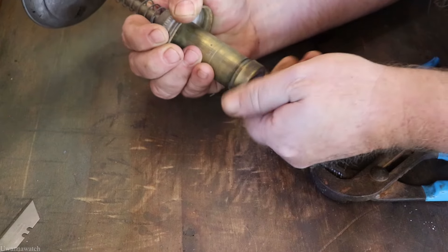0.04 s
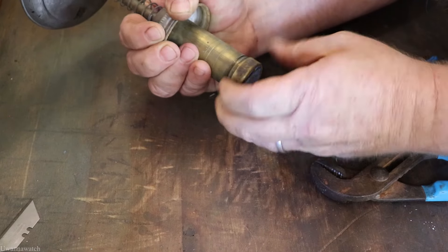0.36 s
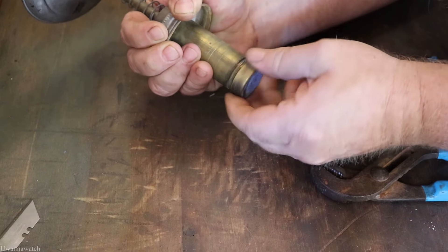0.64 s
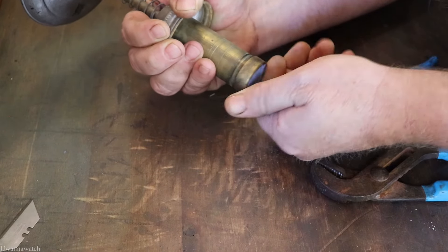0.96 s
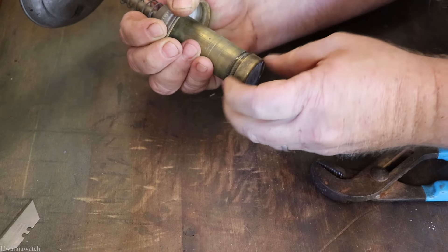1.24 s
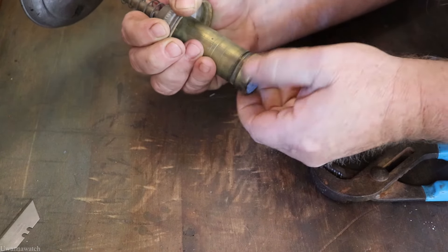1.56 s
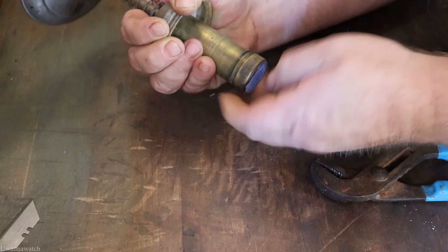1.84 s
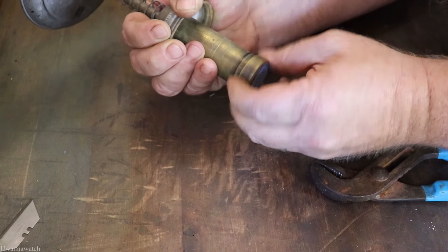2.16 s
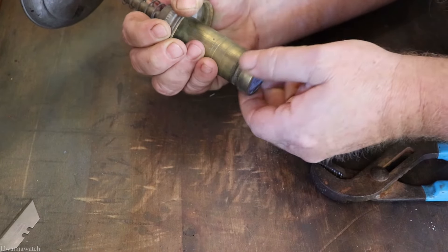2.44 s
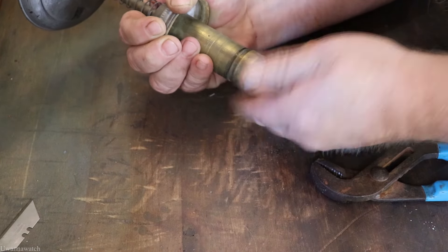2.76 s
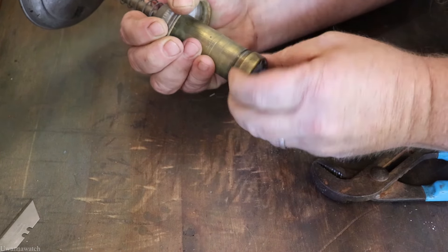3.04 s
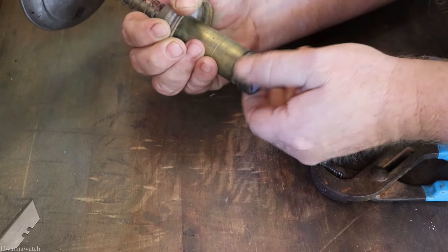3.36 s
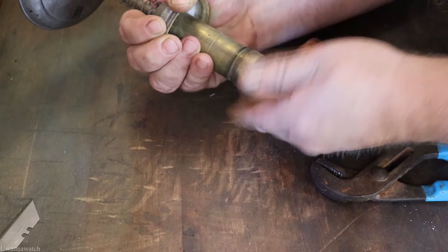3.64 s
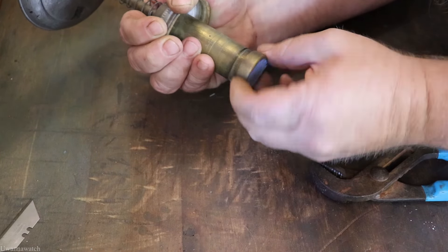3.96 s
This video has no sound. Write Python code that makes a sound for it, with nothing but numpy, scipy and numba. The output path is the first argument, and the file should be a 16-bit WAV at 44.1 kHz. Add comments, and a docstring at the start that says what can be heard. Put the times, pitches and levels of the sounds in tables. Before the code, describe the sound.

Dry threads squeak and scrape close to the microphone as a hand unscrews a brass fitting in five short turns. Light metal clicks fall between the turns, over a steady fan and electrical hum in a small workshop.

```python
"""Dry threads scrape and squeak close to the microphone: a hand unscrews a brass fitting in five
short turns over a workbench. The threads stick and slip in brief tones that turn raspy under
pressure, and the loose parts click at each new grip. Behind them, two groups of dull bumps, a fan
and mains hum fill a small workshop. The recorder's limiter ducks after the loudest squeaks."""
import sys
import numpy as np
from scipy import signal
from scipy.fft import rfft, irfft
from scipy.io import wavfile
from numba import njit

SR = 44100
rng = np.random.default_rng(int(sys.argv[2]) if len(sys.argv) > 2 else 0)


def master_out(mix):
    """Clip the mix to full scale and print it as 16-bit PCM to the path in sys.argv[1]."""
    frames = np.transpose(np.atleast_2d(mix))
    ceiling = np.clip(frames, -1, 1)
    pcm = np.round(ceiling * 32767).astype(np.int16)
    wavfile.write(sys.argv[1], SR, pcm)


N = 176400
T = np.arange(N) / SR

# Squeaks of the threads. Each row: start in seconds, length in seconds, first and last pitch in Hz,
# tone level in dB, then rasp and overtones in dB against the tone, before the brass colours them.
THREAD_SQUEAKS = [ (0.078, 0.018, 5040, 5000, -33, -14, -5), (0.1416, 0.014, 1660, 1346, -16, -0.5, -1),
                  (0.145, 0.028, 2826, 2705, -25.5, 8, -15), (0.176, 0.024, 3032, 2633, -22, 9.5, 5.5),
                  (.687, 0.013, 1696, 1693, -11.5, -3.5, -8), (0.6874, 0.0072, 4950, 4770, -5, -24, -31),
                  (0.696, 0.015, 4855, 4840, -2.5, -26, -13), (0.705, 0.011, 4850, 5040, -14, -2, 3),
                  (.712, 0.045, 4920, 4930, -25, -3, -15), (0.759, 0.023, 3060, 2766, -18, -13, -11),
                  (.762, 0.047, 4900, 4850, -29, -9, -24), (0.775, 0.011, 1730, 1630, -27, -5, -16),
                  (.817, 0.0063, 1570, 1790, -18, -5.5, -21), (.82, .036, 1950, 2220, -27, -10, -6.5),
                  (0.914, 0.033, 2380, 1645, -12.5, -8.5, 2.5), (0.929, 0.029, 1720, 1442, -8.5, -6.5, 2),
                  (0.95, 0.027, 1574, 1742, -15.5, -4, 3.5), (1.007, 0.027, 2970, 2596, -29, -2.5, -14),
                  (1.493, 0.013, 2900, 2770, -27.5, -1.5, -14), (1.515, .009, 1620, 1570, -20, -16, -18),
                  (1.533, 0.025, 1330, 1486, -19.5, -3, -1.5), (1.535, 0.023, 4700, 5020, -14.5, -6, -24),
                  (1.566, 0.017, 2086, 2056, -12.5, -20, -10), (1.571, .014, 5130, 5160, -18, -17, -14),
                  (1.612, 0.013, 1985, 1930, -27.5, -6.5, -14), (2.26, 0.015, 1800, 1690, -27.5, -7, -14),
                  (2.291, 0.015, 1780, 1970, -27, -9, -11), (2.302, 0.022, 4910, 4980, -29, -19, -23),
                  (2.387, 0.02, 4930, 4780, -5, -23, -14.5), (2.403, 0.025, 2200, 2554, -18.5, -1.5, -7),
                  (2.416, 0.015, 1150, 1217, -22.5, -5, -4), (2.442, 0.048, 4950, 4900, -29, -5, -21),
                  (2.495, 0.022, 2030, 1975, -19.5, -15.5, -18),
                  (2.551, 0.028, 2061, 1885, -19.5, -.5, -0.5), (2.557, 0.028, 2866, 2708, -13, -22, -4),
                  (2.581, .038, 2765, 2715, -23, -3.5, -15), (2.614, 0.024, 2380, 2040, -17, -14, -20),
                  (2.647, .022, 2020, 1430, -7.5, -7.5, 2), (2.663, 0.015, 1669, 1740, -8.5, -2, -22),
                  (2.729, .018, 1667, 1370, -20.5, -1.5, -20), (3.224, .013, 1470, 1370, -20.5, -9, -9),
                  (3.236, 0.025, 2857, 2680, -7.5, -19, -11), (3.242, 0.022, 4750, 4790, -20, -13, -25),
                  (3.329, 0.0073, 1670, 1540, -21, -9.5, -25), (3.347, 0.029, 1640, 1510, -22, -20, -22),
                  (3.465, .028, 4980, 5060, -33.5, -10, -12), (3.512, .0074, 2940, 3060, -20.5, -6.5, -7),
                  (3.545, 0.036, 2008, 1957, -13.5, -11, -6)]
# How well the fitting radiates a squeak's overtones. Each row: frequency in Hz, gain in dB.
OVERTONE_RADIATION = [(2700, -4), (3800, 1), (5900, -1), (7300, -8), (9400, 5.5), (10800, -14.5),
                      (16000, -12)]
# Resonances of the fitting under friction. Each row: centre in Hz, width in Hz, relative gain in dB.
BRASS_RESONANCES = [(1740, 770, 3.5), (2720, 630, 12), (3680, 370, 10), (4817, 130, 18.5), (5160, 99, 1.5),
                    (5760, 200, -1.5), (6720, 50, 5.5), (8670, 71, 6.5), (9140, 79, 0), (10400, 200, -2),
                    (12460, 320, 5.5), (14200, 300, 5), (15500, 160, -5)]
# Treble edge above which the brass hardly rings. Each row: frequency in Hz, gain in dB.
BRASS_ROLLOFF = [(9900, 0.5), (11000, -12)]
# Sliding of the threads, one list for each turn. Each row: time in seconds, level in dB.
TURN_LEVELS = [
    [(0, -32), (.13, -36.5), (.21, -36), (.27, -30.5), (.31, -47)],
    [(.61, -45), (.65, -33.5), (.72, -31), (.84, -28.5), (.89, -34), (1.0, -24), (1.07, -37.5), (1.13, -46)],
    [(1.44, -43), (1.51, -29), (1.63, -31), (1.68, -37.5), (1.73, -54)],
    [(2.22, -54), (2.28, -35), (2.35, -38.5), (2.44, -28.5), (2.53, -49), (2.62, -27), (2.77, -32.5),
     (2.81, -59)],
    [(3.13, -46), (3.19, -39), (3.23, -25.5), (3.30, -35.5), (3.62, -31.5), (3.68, -45)],
]
# Tone of the scrape, on top of the brass resonances. Each row: frequency in Hz, relative gain in dB.
SCRAPE_TONE = [(400, -16), (1500, 17.5), (4300, 9), (4900, 8), (7000, 8.5), (11500, 14), (14000, 9)]
# Clicks from play in the threads. Each row: start in seconds, strength in dB.
GRIP_CLICKS = [(0.558, -15.5), (1.389, -14.5), (1.5403, -6.5), (1.546, -6.5), (1.74, -7), (2.175, -7),
               (2.767, -10), (3.103, -4), (3.612, -14)]
# Ring of the tapped fitting. Each row: frequency in Hz, relative level in dB, seconds to fall 60 dB.
TAP_MODES = [(507.5, -11, 0.17), (563, -18, 0.11), (1560, 4, 0.014), (4700, -4.5, 0.023),
             (6370, -7.5, 0.015), (8950, -26, 0.027)]
# Dull bumps. Each row: start in seconds, knock strength in dB, boom level in dB.
DULL_BUMPS = [(0.07, -27, -40), (0.2, -26, -42), (0.242, -16, -37), (1.759, -20, -31.5), (1.822, -29, -47)]
# Spectrum of a bump's knock. Each row: frequency in Hz, relative level in dB.
KNOCK_SPECTRUM = [(100, -38), (300, -1.5), (450, -16), (620, -10), (1250, -11), (1800, -25), (5000, -78)]
# The fan's rush, used from 200 Hz up. Each row: frequency in Hz, relative density in dB.
FAN_RUSH = [(120, -36), (200, -4.5), (380, -7), (647, -0.5), (1400, 0), (3430, -2), (4680, -13.5),
            (6280, -15), (9060, -31.5), (16000, -41.5)]
# The fan's low rumble. Each row: frequency in Hz, relative density in dB.
FAN_RUMBLE = [(20, -25), (50, -13.5), (80, -11), (150, -6.5)]
# Mains hum and a faint motor whine. Each row: frequency in Hz, rms level in dB.
HUM_TONES = [(120, -35.5), (620, -51)]

PEAK_AT, SWELL_POWER, FADE_POWER = .4, .91, .26  # a faint squeak: peak place (0-1), rise and fall curves
LOUD_DELAY, LOUD_SWELL, LOUD_FADE = .56, 1.33, .2  # added at full level: it builds up, then breaks off
JITTER, JITTER_HZ, SHIMMER = .024, 600, .7  # pitch scatter at full rasp, its speed, level scatter
SLIP_SCATTER_RAD, SLIP_SCATTER_HZ = .19, 1100  # uneven timing of the slips, its speed
OVERTONE_DB_PER_OCTAVE, BLOOM = -3.5, .18  # bloom brings each higher overtone in later
SCREECH_HZ, SCREECH_DB = 8500, -17  # lower edge of the screech, its gain at full level
FINE_MODES_T60_S, FINE_MODES_DB = .09, -5
CATCHES_PER_S, CATCH_SPREAD_DB, SLIDE_DB = 650, 4, -8  # smooth sliding is set against the catches
CRACK_DB, RING_DB = -4.5, -12.5
HARD_CRACK_S, HARD_CRACK_HZ = .001, 21800  # rise and treble edge at full strength, before the TOP_HZ cap
KNOCK_S, BOOM_S, BOOM_HZ, BOOM_WIDTH_HZ = .021, .019, 77, 26
FAN_DB = -31
ROOM_DB, ROOM_T60_S, ROOM_GAP_S = -9, .2, .0067
LIMIT_DB, LIMIT_ATTACK_S, LIMIT_HOLD_S, LIMIT_RELEASE_DB_PER_S = -7.5, .00046, .028, 159
TOP_HZ = 15800


def squeaks():
    """Stick-slip tones up close: under pressure the cycle grows uneven, gains overtones and rasps."""
    tones, overtones, rasp, load = np.zeros((4, N))
    jitter, shimmer = wander(JITTER_HZ), wander(hz=175)
    grit = noise() * undb(1.6 * wander(hz=1200))
    scatter = wander(SLIP_SCATTER_HZ)
    for start, length, first_hz, last_hz, db, rasp_db, overtone_db in THREAD_SQUEAKS:
        progress = np.linspace(0, 1, int(length * SR))
        span = np.arange(len(progress)) + int(start * SR)
        level = undb(db)
        peak = min(PEAK_AT + LOUD_DELAY * level, .95)
        swell = (progress / peak) ** (SWELL_POWER + LOUD_SWELL * level)
        fade = ((1 - progress) / (1 - peak)) ** (FADE_POWER + LOUD_FADE * level)
        pressure = np.minimum(swell, fade)
        bite = np.sqrt(pressure)
        roughness = min(undb(rasp_db / 2), 1) * bite
        glide_hz = first_hz + (last_hz - first_hz) * progress
        hz = glide_hz * (1 + JITTER * roughness * jitter[span])
        phase = 2 * np.pi * np.cumsum(hz) / SR
        offsets = 2 * np.pi * rng.random(size=16)
        slip_phase = phase + SLIP_SCATTER_RAD * scatter[span]
        harmonics = 0
        for k in range(2, int(TOP_HZ / first_hz) + 1):
            weight = undb(OVERTONE_DB_PER_OCTAVE * np.log2(k)) * pressure ** (BLOOM * (k - 2))
            harmonics += weight * np.sin(k * slip_phase + offsets[k])
        envelope = level * pressure * np.exp(SHIMMER * roughness * shimmer[span])
        add(tones, start, np.sqrt(2) * envelope * np.sin(phase))
        add(overtones, start, np.sqrt(2) * envelope * bite * undb(overtone_db) * harmonics)
        add(rasp, start, envelope * bite * undb(rasp_db) * grit[span] * (1 + .5 * np.cos(phase)))
        add(load, start, envelope)
    # Heavy pressure drives the highest resonances harder.
    highpass = signal.butter(4, SCREECH_HZ, "high", fs=SR, output="sos")
    screech = undb(SCREECH_DB) * np.sqrt(load) * signal.sosfiltfilt(highpass, rasp)
    return tones + colour(overtones, OVERTONE_RADIATION) + brass(rasp + screech)


def scrape():
    """The threads slide through each turn: burrs catch at uneven moments and ring the brass."""
    effort = sum(undb(np.interp(T, *np.array(turn).T, left=-120, right=-120)) for turn in TURN_LEVELS)
    catches = (rng.random(N) < CATCHES_PER_S / SR) * np.sign(noise())
    catches *= undb(CATCH_SPREAD_DB * np.clip(noise(), -2, 2))
    friction = unit(catches) + undb(SLIDE_DB) * noise()
    return effort * unit(colour(brass(friction), SCRAPE_TONE))


def clicks():
    """Metal taps metal: a crack, shorter and brighter when harder, and a ring damped by the hand."""
    rings, cracks = np.zeros((2, N))
    t = T[:SR // 4]
    for start, db in GRIP_CLICKS:
        for hz, mode_db, t60 in TAP_MODES:
            level = undb(db + RING_DB + mode_db + 2 * rng.standard_normal())
            add(rings, start, level * np.sin(2 * np.pi * hz * t) * decay(t, t60))
        hardness = undb(db / 2)
        age = t * hardness / HARD_CRACK_S
        burst = rng.standard_normal(len(t)) * age * np.exp(1 - age)
        lowpass = signal.butter(2, min(HARD_CRACK_HZ * hardness, TOP_HZ), fs=SR)
        add(cracks, start, undb(db + CRACK_DB) / 2 * signal.lfilter(*lowpass, burst))
    return rings + brass(cracks)


def brass(drive):
    """The fitting rings at its main resonances and at many weak, close modes around them."""
    t = T[:SR // 10]
    impulse = signal.unit_impulse(len(t))
    main_modes = sum(undb(db) * resonate(impulse, hz, width) for hz, width, db in BRASS_RESONANCES)
    diffuse = rng.standard_normal(len(t)) * decay(t, FINE_MODES_T60_S)
    fine_modes = signal.fftconvolve(main_modes, diffuse)[:len(t)]
    ring = unit(main_modes) + undb(FINE_MODES_DB) * unit(fine_modes)
    return colour(convolve(drive, ring), BRASS_ROLLOFF)


def bumps():
    """Dull knocks behind the metal, each followed by a low boom."""
    knock, boom = np.zeros((2, N))
    knock_shape = np.exp(-T / KNOCK_S) * (1 - np.exp(-20 * T / KNOCK_S))
    boom_shape = T / BOOM_S * np.exp(1 - T / BOOM_S)
    for start, knock_db, boom_db in DULL_BUMPS:
        add(knock, start, undb(knock_db) * knock_shape)
        add(boom, start, undb(boom_db) * boom_shape)
    rumble = resonate(resonate(noise(), BOOM_HZ, BOOM_WIDTH_HZ), BOOM_HZ, BOOM_WIDTH_HZ)
    return knock * unit(colour(noise(), KNOCK_SPECTRUM)) + boom * unit(rumble)


def room(direct):
    """The direct sound reaches the microphone first, then a short tail from the bench and walls."""
    t = T[:SR // 2]
    tail = rng.standard_normal(len(t)) * decay(t, ROOM_T60_S) * (t > ROOM_GAP_S)
    return direct + undb(ROOM_DB) * convolve(direct, tail)


def fan_and_hum():
    """The workshop's room tone: steady fan noise, mains hum and a faint motor whine."""
    hum = sum(np.sqrt(2) * undb(db) * np.sin(2 * np.pi * (hz * T + rng.random())) for hz, db in HUM_TONES)
    spectrum = FAN_RUMBLE + [(hz, db) for hz, db in FAN_RUSH if hz >= 200]
    return hum + undb(FAN_DB) * unit(colour(noise(), spectrum))


def undb(db):
    """Decibels to gain."""
    return 10 ** (np.asarray(db) / 20)


def unit(x):
    """Scale to rms 1."""
    return x / np.sqrt(np.mean(x ** 2) + 1e-18)


def noise():
    """White noise."""
    return rng.standard_normal(N)


def wander(hz):
    """Random drift of rms 1, rolled off above hz."""
    return unit(signal.sosfilt(signal.butter(2, hz, fs=SR, output="sos"), noise()))


def decay(t, t60):
    """A fall of 60 dB every t60 seconds."""
    return np.exp(-np.log(1000) * t / t60)


def colour(x, points):
    """Filter by a curve of (Hz, dB) points."""
    hz, db = np.array(points, float).T
    bins_hz = np.maximum(np.arange(N + 1) * SR / (2 * N), 1)
    gain = undb(np.interp(np.log(bins_hz), np.log(hz), db))
    return irfft(rfft(x, 2 * N) * gain)[:N]


def resonate(x, hz, width):
    """One resonance, gain 1 at its centre."""
    return signal.lfilter(*signal.iirpeak(hz, hz / width, fs=SR), x)


def convolve(x, response):
    """Pass x through an impulse response scaled to energy 1."""
    return signal.fftconvolve(x, response / np.linalg.norm(response))[:N]


def add(out, start, x):
    """Mix x into out from start, in seconds."""
    i = max(int(start * SR), 0)
    out[i:i + len(x)] += x[:N - i]


def scene():
    """One mono channel: the fitting and the bumps in the small room, over its room tone."""
    return (room(squeaks() + scrape() + clicks() + bumps()) + fan_and_hum())[None]


@njit
def limiter_cut(over_db):
    """The limiter's gain reduction in dB: quick to rise, held, then let go at a steady rate."""
    out, cut, wait = np.zeros(len(over_db)), 0., 0.
    for i in range(len(over_db)):
        if over_db[i] > cut:
            cut += (over_db[i] - cut) / (LIMIT_ATTACK_S * SR)
            wait = LIMIT_HOLD_S * SR
        elif wait > 0:
            wait -= 1
        else:
            cut = max(cut - LIMIT_RELEASE_DB_PER_S / SR, 0.)
        out[i] = cut
    return out


def record(dry):
    """The recorder limits the microphone signal, rounds its peaks and cuts the top steeply."""
    mic = dry[0]
    over_db = 20 * np.log10(abs(mic) + 1e-9) - LIMIT_DB
    limited = mic * undb(-limiter_cut(over_db))
    rounded = limited / (1 + (limited / .9) ** 8) ** (1 / 8)
    top_cut = signal.ellip(10, .2, 80, TOP_HZ, fs=SR, output="sos")
    return signal.sosfilt(top_cut, rounded)[None]


dry = scene()
out = record(dry)
master_out(out)
```